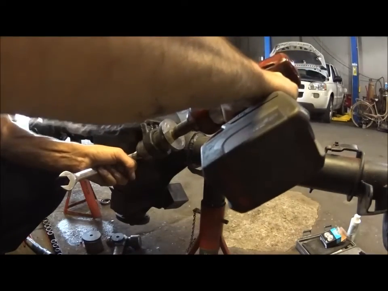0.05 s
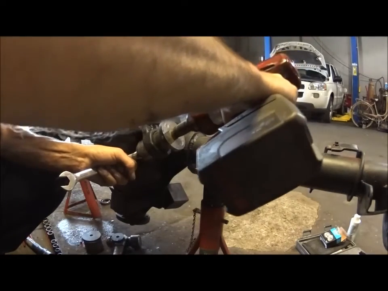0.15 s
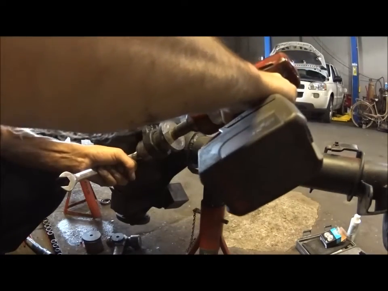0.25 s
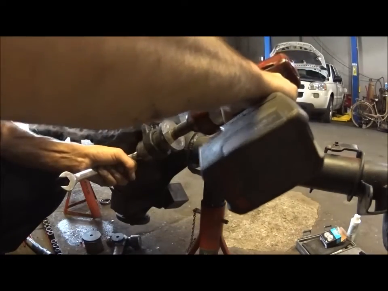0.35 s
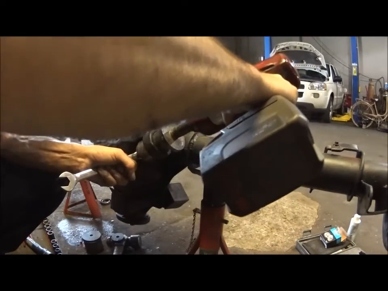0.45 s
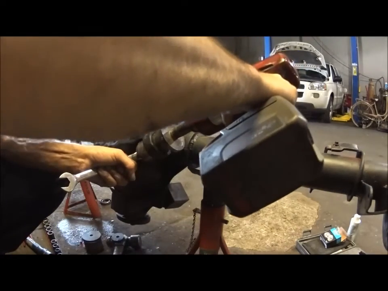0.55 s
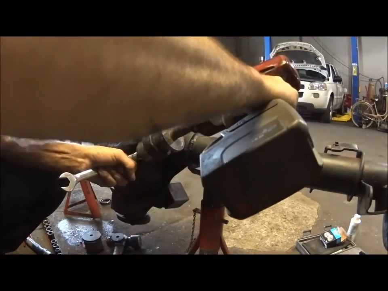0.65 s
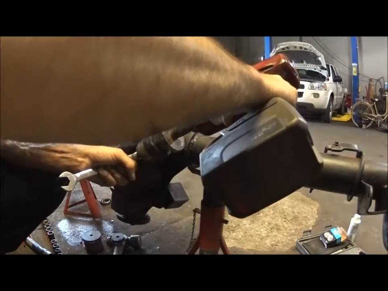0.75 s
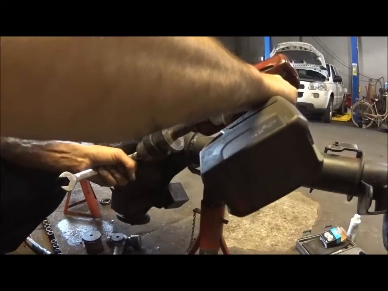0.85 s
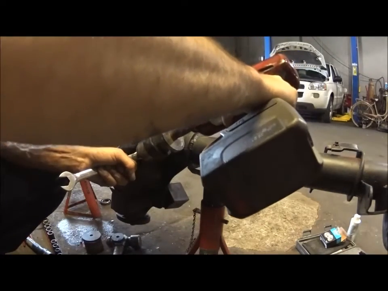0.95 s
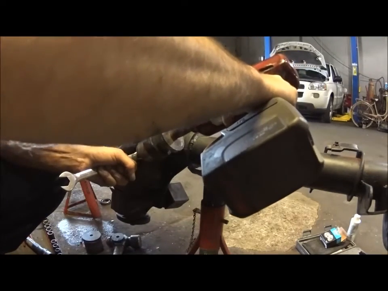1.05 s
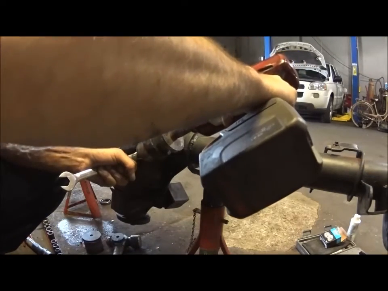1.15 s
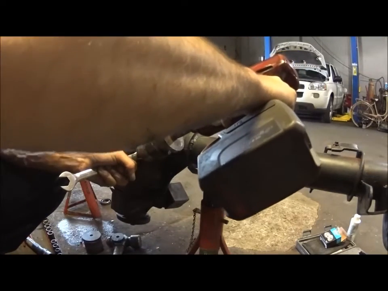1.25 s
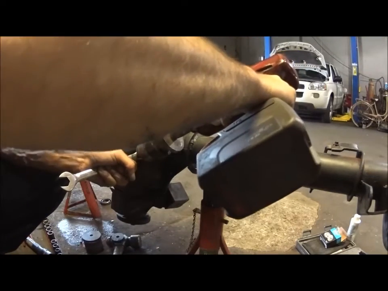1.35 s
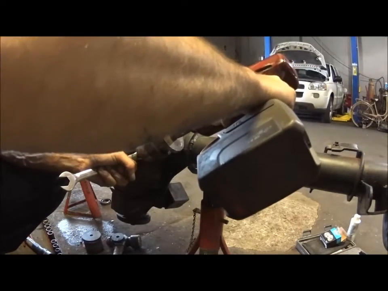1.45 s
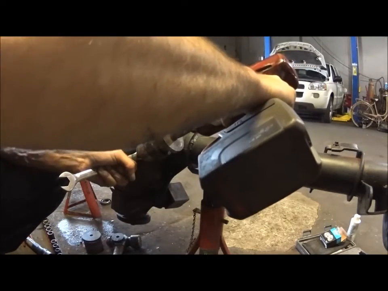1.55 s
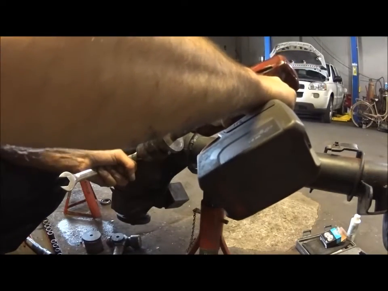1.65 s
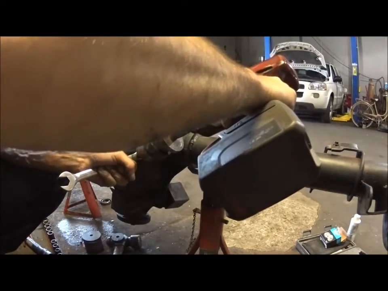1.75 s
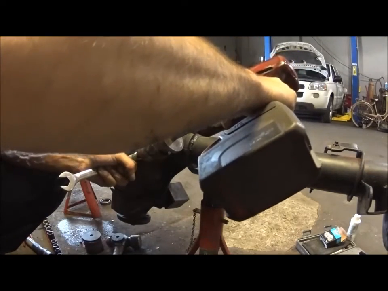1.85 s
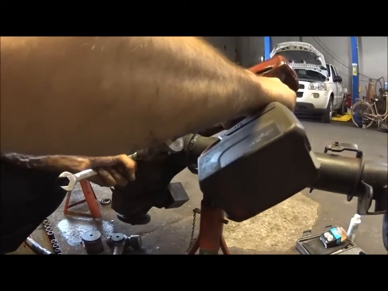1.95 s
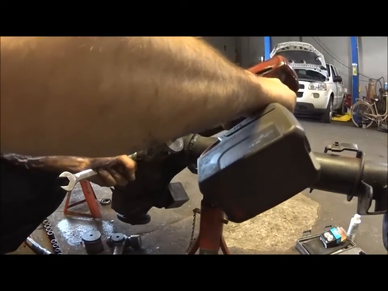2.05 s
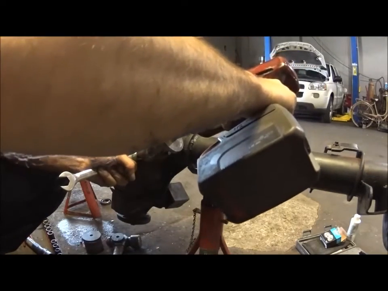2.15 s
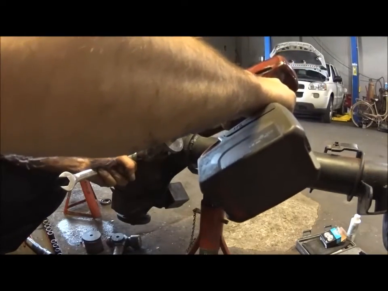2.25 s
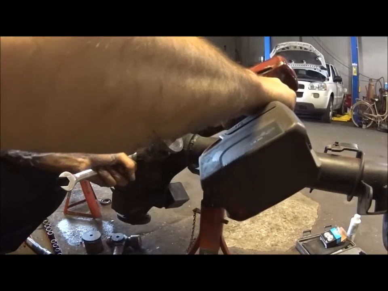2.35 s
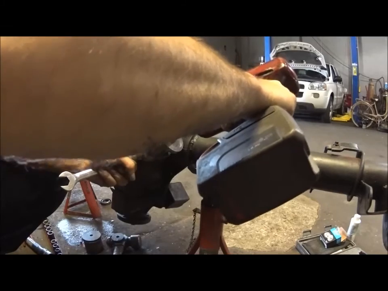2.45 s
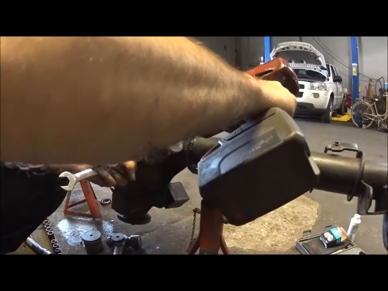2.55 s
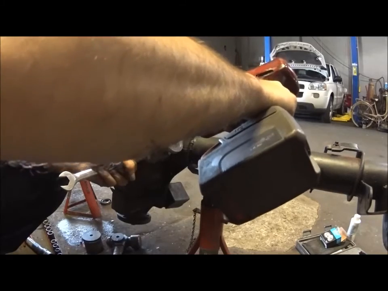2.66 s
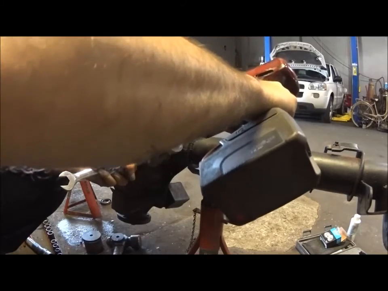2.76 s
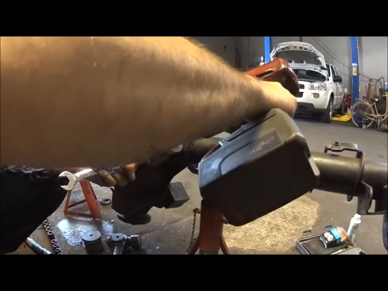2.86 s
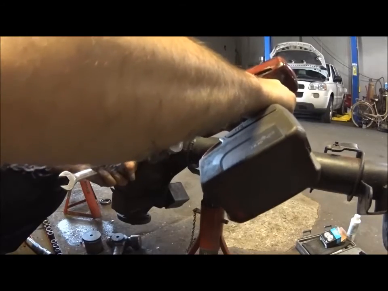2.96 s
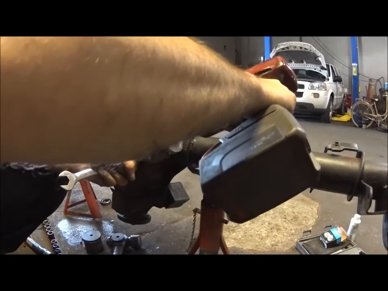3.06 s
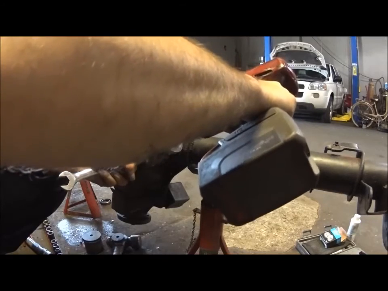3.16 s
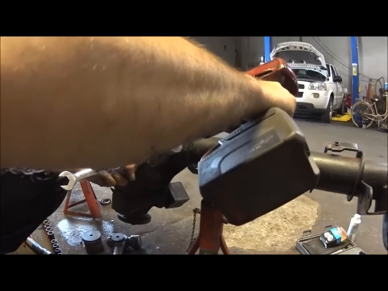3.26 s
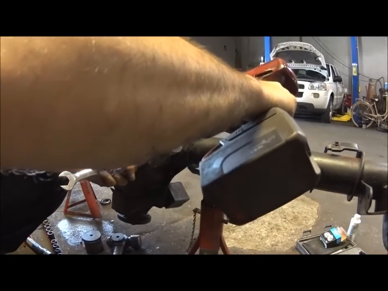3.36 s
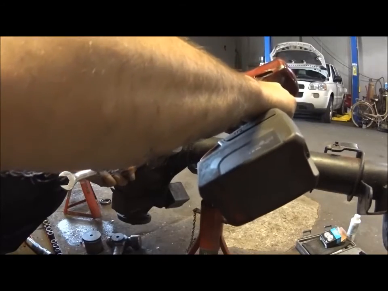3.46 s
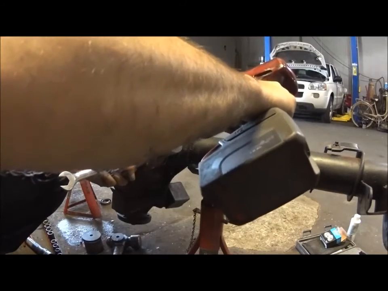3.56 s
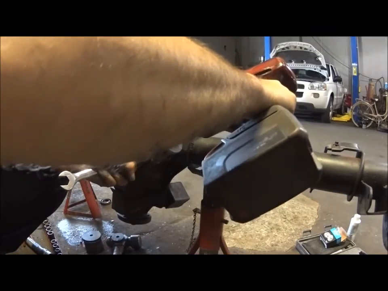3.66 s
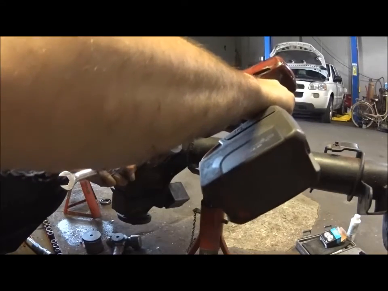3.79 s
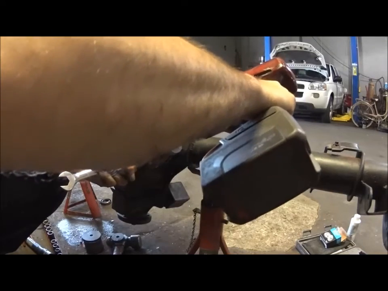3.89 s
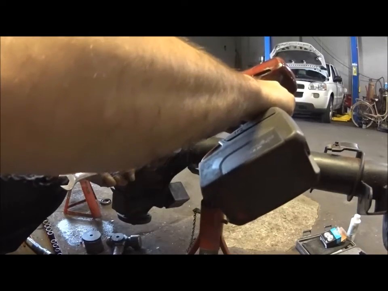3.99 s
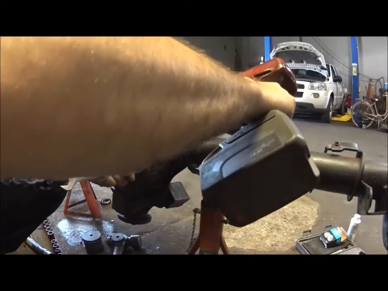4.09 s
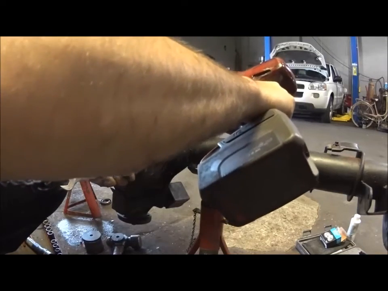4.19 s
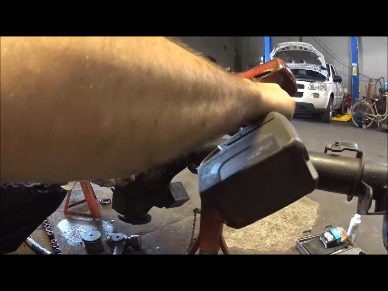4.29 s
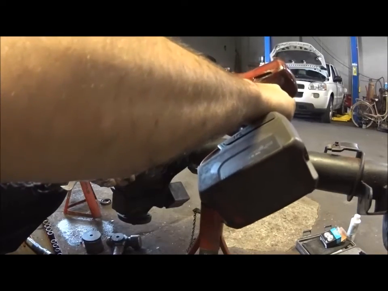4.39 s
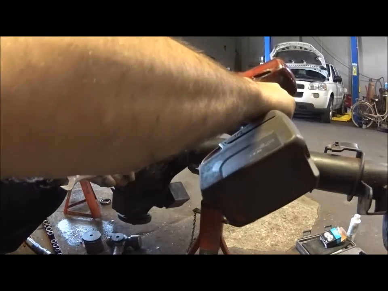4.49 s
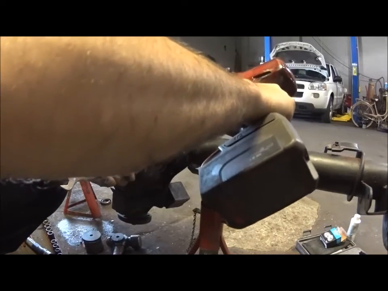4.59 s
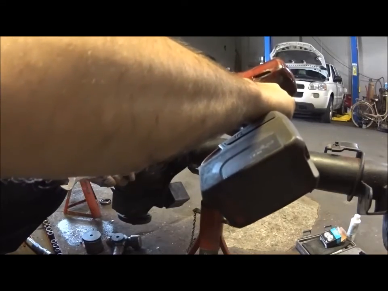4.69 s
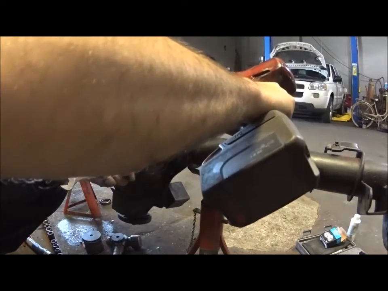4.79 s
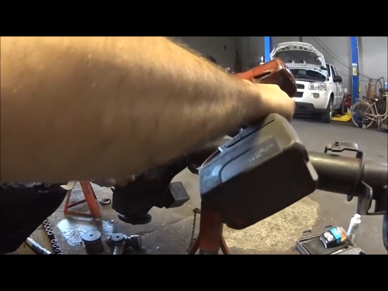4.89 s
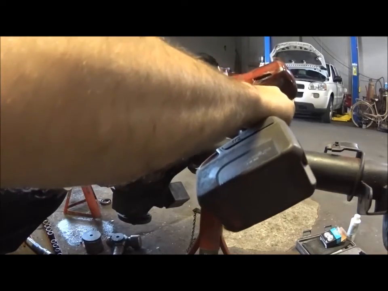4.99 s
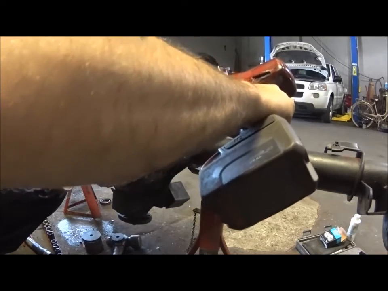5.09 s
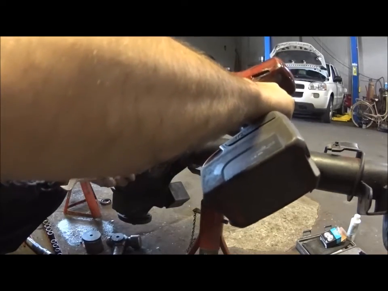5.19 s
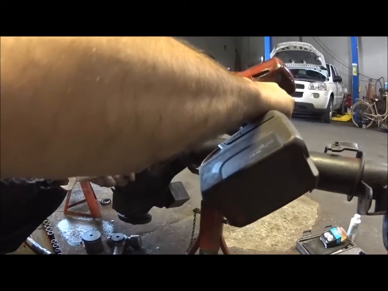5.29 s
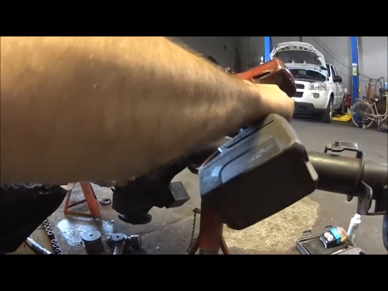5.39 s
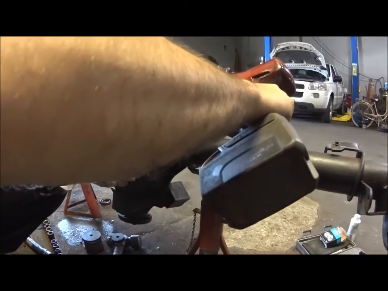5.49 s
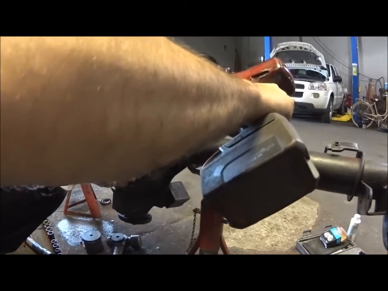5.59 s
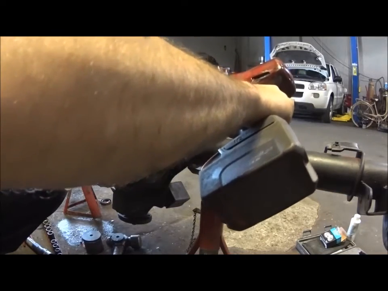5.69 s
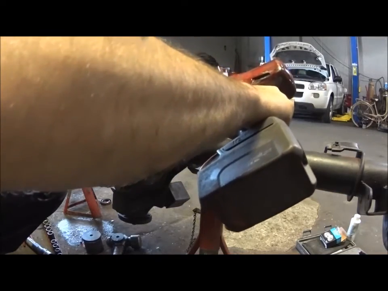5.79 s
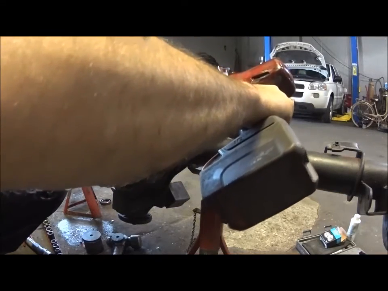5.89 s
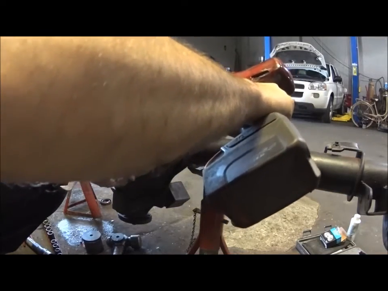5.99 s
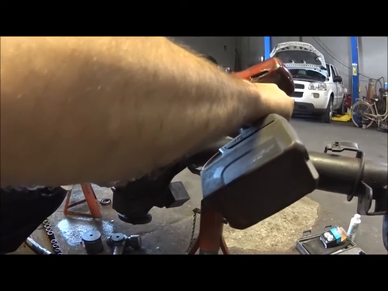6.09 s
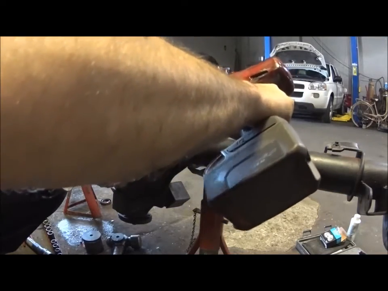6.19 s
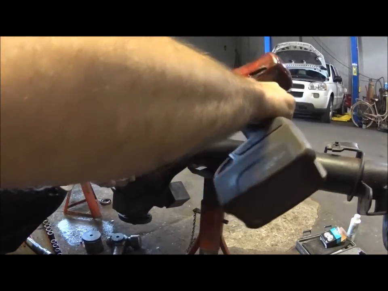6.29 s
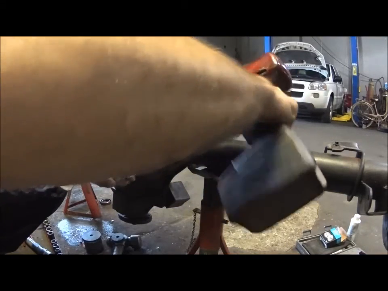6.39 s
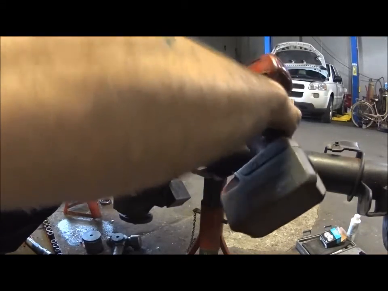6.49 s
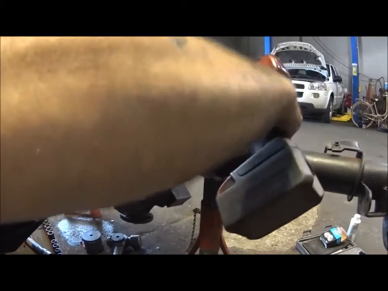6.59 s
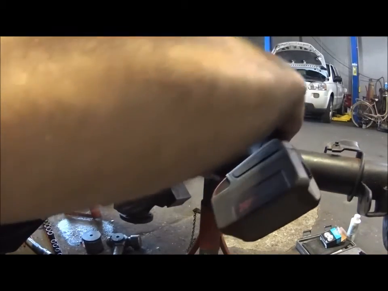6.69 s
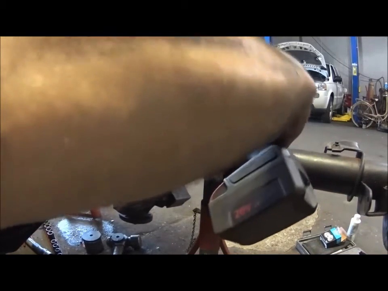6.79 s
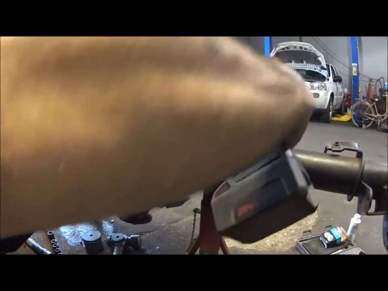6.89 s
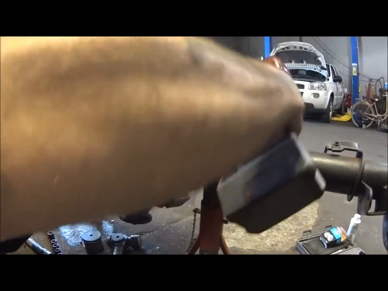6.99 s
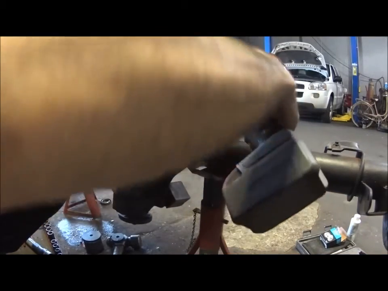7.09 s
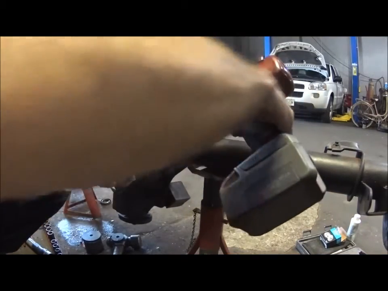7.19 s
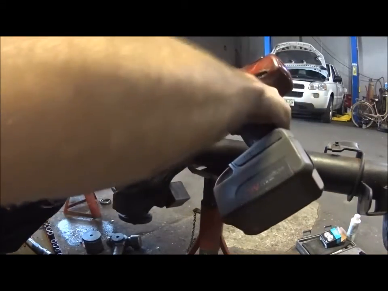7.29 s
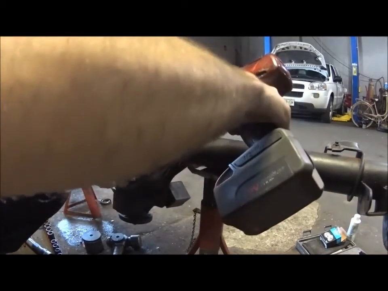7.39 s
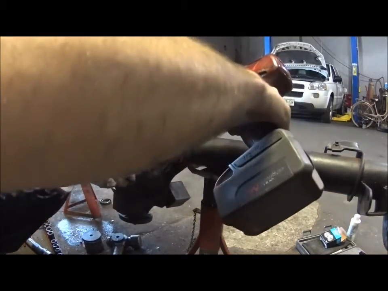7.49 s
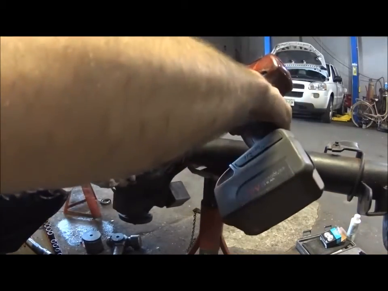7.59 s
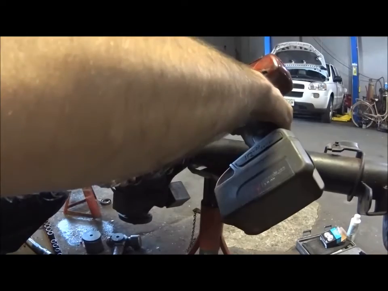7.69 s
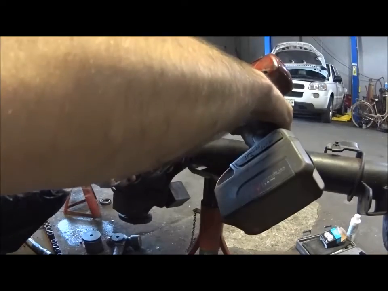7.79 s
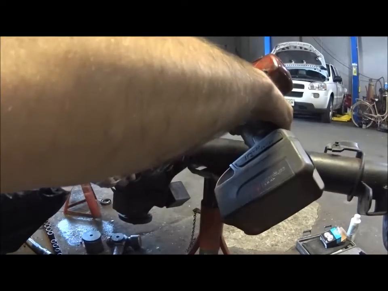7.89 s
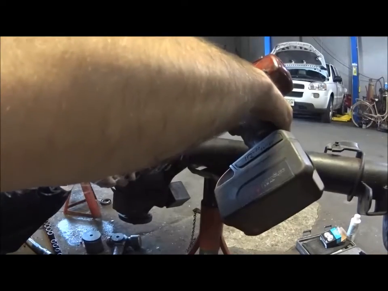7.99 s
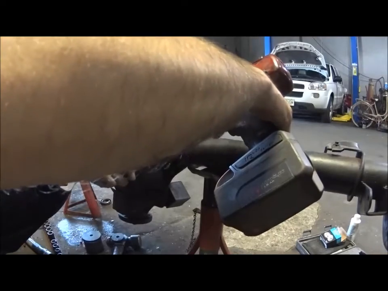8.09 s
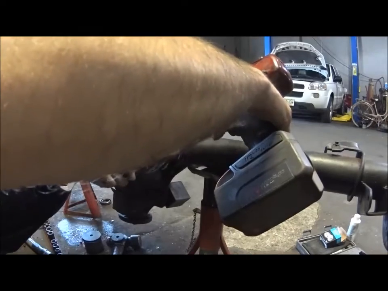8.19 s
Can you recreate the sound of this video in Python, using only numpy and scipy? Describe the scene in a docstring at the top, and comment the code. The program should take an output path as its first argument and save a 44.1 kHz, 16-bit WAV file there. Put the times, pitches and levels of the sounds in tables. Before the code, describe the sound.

Loud, rasping metal hammering fills the opening: a power wrench in a steel housing, each fast turn mixing loose rattle, rebound and a bright blow. The pitch barely moves while the metallic colour shifts as the bolt tightens. It cuts off suddenly, leaving a short ringing tone and garage reverberation. Half a second later comes one sharp mechanical click, then tiny dull taps and a quiet room wash with low hum. Close, slightly overloaded stereo microphone.

```python
"""First heard, already at full speed: an impact wrench on a bolt in a steel housing, close to a small
stereo microphone in a garage. Each turn brings loose rattle, dull knocks, a rebound, a hush and a bright blow.
Shaped noise bursts drive resonators for the steel; decaying sines make thud, pings, ringing and clicks.
The trigger is let go at 6.3 s, steel and room ring out, a latch clicks, and air and hum go on."""
import sys
import numpy as np
from scipy import signal
from scipy.fft import rfft, irfft, next_fast_len
from scipy.io import wavfile
from scipy.ndimage import uniform_filter1d

SR = 44100
rng = np.random.default_rng(int(sys.argv[2]) if len(sys.argv) > 2 else 0)


def put_to_file(sound):
    """Save the sound as 16-bit audio at rate SR, in the file named by the first command-line argument."""
    columns = np.atleast_2d(sound).T  # one column per channel
    safe = np.clip(columns, -1, 1)
    whole_steps = np.round(safe * 32767)
    wavfile.write(sys.argv[1], SR, whole_steps.astype(np.int16))


N = 363825
TIME = np.arange(N) / SR  # s
LAST_BLOW_S, STOP_S = 6.314, 6.337  # last blow; the trigger is let go


def amp(db):
    """Amplitude factor of a level in dB."""
    return 10 ** (np.asarray(db) / 20)


def evened(x):
    """Scale to rms 1."""
    return x / np.sqrt(np.mean(x ** 2) + 1e-20)


def read(points, hz):
    """Interpolate a (f/Hz, value) table along log frequency."""
    f, value = np.transpose(points)
    return np.interp(np.log(hz + 1), np.log(f + 1), value)


def colour(x, points):
    """Causal minimum-phase filter whose gain follows a (f/Hz, level/dB) table."""
    gain = np.log(amp(read(points, abs(np.fft.fftfreq(4096, 1 / SR)))))
    taps = np.fft.ifft(np.exp(gain - 1j * signal.hilbert(gain).imag)).real[:2048]
    return signal.oaconvolve(x, taps)[:len(x)]


def resonate(x, hz, width):
    """One mode as a two-pole resonance, gain 1 at its centre."""
    return signal.lfilter(*signal.iirpeak(hz, hz / width, SR), x)


def wander(step):
    """Slow chance of rms 1: a new value every step seconds, joined by lines."""
    knots = np.arange(0, N / SR + 2 * step, step)
    return evened(np.interp(TIME, knots, rng.standard_normal(len(knots))))


def per_turn(turns, spread_db):
    """A random gain that is drawn anew for every turn."""
    gains = amp(spread_db * rng.standard_normal(int(turns.max()) + 1))
    return gains[turns.astype(int)]


def chatter(sharp_db):
    """Dense steel-on-steel contacts: noise with a few strong samples."""
    strength_db = sharp_db * np.minimum(rng.exponential(1, N), 5)
    return evened(rng.standard_normal(N) * amp(strength_db))


def strokes(rows, turns, spread_db, sharp_db):
    """Bursts of contacts that start at once and die away, at fixed places in each turn."""
    out = np.zeros(N)
    for place, db, decay_s in rows:
        count = np.floor(turns + 1 - place)
        starts = np.diff(count, prepend=count[0]) > 0
        start = starts * per_turn(count, spread_db)
        out += amp(db) * signal.lfilter([1], [1, -np.exp(-1 / (decay_s * SR))], start)
    return out * chatter(sharp_db)


# hammer speed: sags as the bolt tightens, the last full turn drags, then the hammer slips free
# columns: t/s, speed/turns per s
HAMMER_SPEED = [(0, 32.463), (1.25, 32.738), (3.0, 32.359), (3.75, 32.405), (6.279, 32.04), (6.281, 26.6),
                (6.315, 26.6), (6.317, 41)]
FIRST_TURN = .498  # part of a turn already done at the start


def hammer_turns():
    """Turns completed so far, the running sum of the speed."""
    return FIRST_TURN + np.cumsum(np.interp(TIME, *np.transpose(HAMMER_SPEED))) / SR


# strength of each turn of the hammer against the usual turn, one row per turn; CONTRAST widens every level
# columns: blow level/dB, rattle level/dB, rebound snap level/dB, rebound weight level/dB
TURN_LEVELS = [(0.0, 3, 1, -0.5), (-3, 1.5, 3, 1), (4.5, 0, 4, -3), (4, 1, 3.5, 2.5), (3.5, 0, 1.5, 6),
               (-2.5, 1, -2.5, -6.5), (-4, 2, -5, 4), (3.5, 1.5, -3, 5.5), (-6.5, 0.5, -1, -1.5),
               (4, 2, -8.5, 0.5), (-7, 4, -2.5, -6), (1.5, -4.5, 3, 3), (3, 2, -5, 7.5), (5, 0.5, 5, 2.5),
               (-7, 2.5, 0.5, -2), (-1, 0.5, -4, 2.5), (-1.5, -2, -1, 5.5), (-2, 2.5, 4.5, 5),
               (-5.5, 2, 2.5, 4), (0.5, -1.5, -1, -6), (-2, 1, 0.5, 0), (-6.5, 1.5, -7, -1),
               (1.5, -2, 2.5, 5.5), (-1, -4, 3, 0.5), (4.5, -0.5, 6, 1), (2.5, 1.5, -1, 0.5),
               (-0.5, 1, 3.5, 4), (-1.5, -0.5, -2, 0.5), (1.5, 4, 1, 3), (4.5, 0, 11.5, 3.5),
               (-1, -0.5, -1, -1), (-6, 1, -5, 6.5), (0, 1, 3, 2.5), (-0.5, 2, -1.5, 0.5),
               (0.5, -3, 4.5, -10.5), (1.5, 3, -3, 3.5), (-0.5, 1.5, 4, -6.5), (0.5, 1, 1, -1.5),
               (-2, 0.5, 0.5, 1), (0.5, -3.5, 6.5, 4), (0, -1, 5, 2.5), (2, 2, 2, -1), (0, -0.5, 5, 4),
               (1.5, 1, 0.5, 3), (4.5, 2, 3.5, 1.5), (-1.5, 0.5, -4, 1.5), (-5.5, 3.5, 2, -3),
               (-4.5, 0.5, -3, 1.5), (-2, 3, -1, 3.5), (-2, 4.5, 1.5, -1.5), (-0.5, -5.5, 6, 1.5),
               (0.5, 1.5, 1, -2.5), (1, 0, -2.5, 2.5), (4, 0.5, 2, 5.5), (-1, 0.5, -3.5, 0),
               (1.5, -0.5, -3.5, 1), (-2, 2.5, -2.5, 4.5), (-2, 1.5, -7, -7), (-0.5, 0, -5, -0.5),
               (-4, 1.5, -2, -2), (-0.5, 0, 2.5, -0.5), (3.5, 3, 0.5, -5.5), (-1, 1.5, 0.5, 3),
               (2, -2, -2.5, 1), (-4.5, 1.5, -5, 0.5), (5.5, 1.5, 1, 1.5), (3.5, 0, 7.5, 0.5),
               (-1, -0.5, 4, 1.5), (-6.5, 1, -1, -11.5), (-1, 1, -3.5, 2), (-3.5, 4.5, 1.5, -3.5),
               (1, 1, -3.5, 2), (-5.5, 4.5, -3, 1.5), (-3, 2, -1, 2), (-0.5, -0.5, -2, 1.5),
               (2.5, 1, -2, 3), (-1.5, -0.5, 2, -0.5), (0, 0.5, -1, -1.5), (3, 3.5, 2, -0.5),
               (-1, 2.5, 1, -6.5), (-3, -4.5, 5.5, 3), (0, 3.5, -3, -1), (-5, 2, -11, -4.5),
               (-1, -1.5, -2, -8), (3.5, -1.5, 5, -3), (0.5, 1.5, 3, 3.5), (-1.5, -2.5, 5.5, 1),
               (1.5, 1.5, -1.5, -0.5), (-8, 2.5, -10, 3.5), (5, 1, -4.5, -7.5), (1.5, -1, -3.5, -4.5),
               (3, 1.5, -3.5, 1.5), (-4.5, -1, 2.5, 4.5), (-3.5, 1, -8, 2), (1, -1, 7, 2), (3, 2, 0, 0),
               (2, 1, -1.5, -2), (3, 2, -2, -3), (-0.5, 0.5, 2.5, -1), (4.5, 4, -2, 2), (-7.5, 2, -4, 1),
               (-4.5, 3, 0, -5.5), (-1, -1, 0, 2.5), (4.5, 2.5, -7, 0), (0.5, 2, 4.5, -2),
               (2, -1.5, -9, -5), (0.5, 1, -7, -2), (1, 2.5, 5.5, 0.5), (-1.5, 1.5, -2.5, -1.5),
               (4, 1.5, -1.5, -3), (6, 1, 2.5, -3.5), (0.5, 1.5, -4, 0), (1.5, -1, -3.5, 0.5),
               (-1.5, 4, 1, -4.5), (1, 0.5, -2.5, 1), (-3, 4.5, 6, -8), (-3.5, 0, -1.5, -5),
               (-1, -0.5, 2.5, 1.5), (3.5, 0.5, -4.5, -5), (-3.5, 1.5, -10, -9.5), (-3, 0, -6, 2.5),
               (2.5, 3, -3, -8), (1, 1.5, 0, 0), (6, 3.5, 0, 4), (-2.5, 0.5, 2.5, 3), (-5, -0.5, 5, -0.5),
               (4.5, 2, -2, 0.5), (-5.5, 2.5, 2.5, 3.5), (-2.5, 2.5, 9.5, 0), (-4.5, 1.5, -2.5, -3.5),
               (2.5, 2.5, -2, -0.5), (-2, -1.5, 0.5, -5), (4.5, -4.5, 4, 1.5), (1, -3, -0.5, -2.5),
               (3.5, 0.5, -8.5, -9.5), (-1, 1.5, -7, 2.5), (-4, 2, -1.5, 1.5), (1.5, 0.5, 0, -1.5),
               (-5, 4, -7, -6.5), (0, 1, 0.5, 1), (4.5, 2, 2, -3), (-4, 2.5, 6, -4.5), (1.5, 0.5, 4, 2.5),
               (2, 2, -3, 5.5), (-1.5, -4, 2.5, 3.5), (0, 2, 3, -8), (-5, 4.0, 0.5, -7.5), (0, -1, -3, 4),
               (-1, -1, -7.5, -3), (-6, 4, -2.5, -8), (2, -0.5, 0.5, 1.5), (5, 0.5, -8, -1.5),
               (-4, 3.0, -4.5, -5), (-12, 3.5, 2, 0), (1, 2, 5.5, 1.5), (1.5, -3.5, 2, -1.5),
               (-0.5, -2, -1, 1), (4.5, 1, 1, 0.5), (-1.5, 1, 9, -4), (3.5, 4, -4, -2.5),
               (-3, 2, 0.5, -3.5), (3, 2, -3, -2.5), (0, 1, 0, 0.5), (-3, -0.5, 2.5, 1),
               (3.5, 3.5, 3, -4.5), (4.5, 3, 1, -4), (1, 2.5, 0, -4.5), (1, 1.5, -2, 2),
               (3.5, 1.5, -3, 3.5), (0, 1, 2.5, 2.5), (-4, 2.5, 0, -7), (8.5, 1, 8.5, -13.5),
               (-0.5, 0.5, -2.5, 0.5), (-3, 3, -3.5, -0.5), (-6, 4, -3, 3), (-2, -0.5, 0.5, 4),
               (2, 3.5, -3, -2.5), (0, -2.5, 0.5, -1), (-1.5, 3, -4, -10.5), (2, 2, 2.5, 1),
               (-1, 2.5, 6, 4), (1.5, 1, 4, 3.5), (4.5, -1.5, -4.5, -4.5), (3.5, 1.5, 4.5, 2),
               (1.5, -2, -0.5, -8), (-2, -2, 6.5, -5.5), (0, -2, 5.5, 0.5), (-4.5, 1.5, -0.5, 6.5),
               (2, 1, 1, -1), (-3.5, 4, 1.5, 1.5), (1, 1, -3, -2.5), (-9, 3.5, -6.5, 3),
               (-0.5, 2.5, 5.5, -3.5), (1.5, 1.5, 2.0, -3.5), (6.5, 1, 2.5, -3.5), (-0.5, 0.5, 4, -4),
               (-1.5, 4, -5, -1), (7.5, 1.5, 3.5, -2), (-5, 1.5, 2, -8), (1.5, 0.5, -3, -2.5),
               (3.5, 2.5, -0.5, -12.5), (1, 1.5, -1, -2.5), (-7.5, -3, 0.5, 1.5), (6, -1.5, 2.5, -4.5),
               (-1, -1.5, -2, -0.5), (0, 2.5, -11, -7.5)]
CONTRAST = 1.17
TURN_START = .96  # place in the turn 0-1: a row takes over in the hush before its blow


def turn_strengths(turns):
    """Gains of blow, rattle, snap and rebound weight, held through each turn."""
    row = np.minimum(turns + 1 - TURN_START, len(TURN_LEVELS) - 1).astype(int)
    return amp(CONTRAST * np.transpose(TURN_LEVELS))[:, row]


def tightness():
    """How far the bolt is seated: rises from -0.5 at the start to 0.5 at the stop."""
    return np.minimum(TIME / STOP_S, 1) - .5


# spectrum of the loose steel; columns: f/Hz, level/dB
RATTLE_SPECTRUM = [(24, -46), (40, 1.5), (130, -17.5), (202, -19.5), (461, -8.5), (978, -6.5), (1460, -6.5),
                   (1800, -1.5), (4200, -6), (5830, -6), (7040, -5.5), (10300, -11), (11000, -4.5),
                   (14300, -46), (22000, -120)]


def rattle(shaken):
    """Loose steel: unbroken chatter that comes in clumps."""
    clumps = amp(2.0 * evened(uniform_filter1d(rng.standard_normal(N), 90)))
    return shaken * evened(colour(chatter(2.3) * clumps, RATTLE_SPECTRUM))


# knocks in mid-turn; columns: place in the turn/0-1, level/dB, decay time constant/s
KNOCK_STROKES = [(.37, -2.5, 0.0022), (.525, -1, 0.0013), (.6, -3.5, 0.0017)]
# spectrum of the knocks; columns: f/Hz, level/dB
KNOCK_SPECTRUM = [(300, -18.5), (900, -11), (2000, -12.5), (4000, -17.5), (12000, -46)]


def knock(turns, shaken):
    """Dull bursts of contacts between blow and rebound."""
    bursts = strokes(KNOCK_STROKES, turns, 1.3, 2.34)
    return amp(-9.0) * shaken * evened(colour(bursts, KNOCK_SPECTRUM))


TREBLE_SHARE = .5  # the hiss of a contact follows its force by half the dB
# bright edge of the rebound; columns: place in the turn/0-1, level/dB, decay time constant/s
SNAP_STROKES = [(.70, -3, 0.0025), (.76, -12.5, 0.0014)]
# spectrum of the snap; columns: f/Hz, level/dB
SNAP_SPECTRUM = [(500, -31.5), (3500, -17), (5800, 2.5), (6500, -7), (7300, -3.5), (10000, 0.5), (12000, 2)]


def snap(turns, snappy):
    """Bright contact noise at the rebound."""
    bursts = strokes(SNAP_STROKES, turns, 0.99, 1.5)
    return amp(-2.5) * snappy ** TREBLE_SHARE * evened(colour(bursts, SNAP_SPECTRUM))


# dull part of the rebound; columns: place in the turn/0-1, level/dB, decay time constant/s
REBOUND_STROKES = [(.72, 6.5, 0.0034), (.77, 1.5, 0.0015)]
# spectrum of the rebound; columns: f/Hz, level/dB
REBOUND_SPECTRUM = [(200, -4.5), (800, 8.5), (1500, -3.5), (2300, 3), (3200, -3), (12000, -23)]


def rebound(turns, heavy):
    """The hammer bounces back: duller bursts of contacts."""
    bursts = strokes(REBOUND_STROKES, turns, 1.0, 1.84)
    return amp(-6.0) * heavy * evened(colour(bursts, REBOUND_SPECTRUM))


# hammer on anvil; columns: place in the turn/0-1, level/dB, decay time constant/s
BLOW_STROKES = [(.975, 0, .0007), (.02, -4, .001), (.15, -13, .002)]
# spectrum of the blow; columns: f/Hz, level/dB
BLOW_SPECTRUM = [(200, -31), (900, -21.5), (3300, -16), (4800, 3), (5800, -5), (6500, -8.5), (7300, 2),
                 (10200, 3), (12000, 7)]


def blow(turns, hard):
    """The hammer strikes around each whole turn: very short bright bursts."""
    bursts = strokes(BLOW_STROKES, turns, 1.0, 0.69)
    return amp(2.0) * hard ** TREBLE_SHARE * evened(colour(bursts, BLOW_SPECTRUM))


# contacts just after the blow; columns: place in the turn/0-1, level/dB, decay time constant/s
SHUDDER_STROKES = [(.03, .5, 0.0018), (.13, -2, 0.0038), (.24, -1.5, .003)]
# spectrum of the shudder; columns: f/Hz, level/dB
SHUDDER_SPECTRUM = [(500, -37), (2200, -7.5), (3000, -0.5), (4400, 0), (5500, -3.5), (12000, -14)]
SHUDDER_GAIN_DB = 5  # growth from start to stop as the bolt seats


def shudder(turns, shaken):
    """The steel shudders after the blow: longer bursts that grow as the bolt seats."""
    bursts = strokes(SHUDDER_STROKES, turns, 2.8, 1.2)
    level = amp(-6.5 + SHUDDER_GAIN_DB * tightness())
    return level * shaken * evened(colour(bursts, SHUDDER_SPECTRUM))


# modes of socket, bolt and housing; columns: f/Hz, width/Hz, level/dB
STEEL_MODES = [(965, 40, -2.5), (1007, 28, -1.5), (1165, 40, -4.5), (1345, 50, -4), (1772, 32, 1.5),
               (1929, 32, -3), (2119, 28, 1), (2185, 30, -5), (2510, 30, -6), (2548, 30, -5),
               (2720, 90, -7), (2975, 35, -4), (3035, 26, -1), (3350, 120, -8), (3660, 32, -1),
               (3940, 57, -7), (4600, 40, -5), (4645, 40, -2), (4854, 40, -6), (5005, 40, -6),
               (5262, 39, -3), (5420, 40, -6), (5820, 90, -6), (6045, 54, -5), (6320, 40, 0),
               (6648, 35, -6), (7410, 42, -8), (8283, 50, -6), (9400, 150, -8), (10200, 560, -5)]
# shift in mode strength as the bolt tightens; columns: f/Hz, level gained from start to stop/dB
TIGHTENING_GAIN = [(700, -0.5), (985, 5), (1340, 6.5), (1770, 2.5), (3000, -1.5), (3660, 10.5),
                   (4640, -4.5), (5260, 11), (6320, -2.5), (8280, -25), (10200, -10)]


def steel_modes(drive):
    """The contacts excite resonances; the creeping socket makes each swell and fade over a few turns."""
    flat = evened(colour(drive, [(200, 5.5), (1000, 3.82), (12000, 2.6)]))
    tight, out = tightness(), 0
    for hz, width, db in STEEL_MODES:
        swell = amp(1.7 * wander(.09))
        ends = amp(read(TIGHTENING_GAIN, hz) * np.array([-.5, .5]))
        tightened = np.interp(tight, [-.5, .5], ends)
        out = out + amp(db) * resonate(flat * swell * tightened, hz, width)
    return evened(out)


# push of the tool body at the rebound; columns: f/Hz, level/dB, t60/s
BODY_THUD = [(492.5, 15.5, 0.026), (674, 10, 0.03)]


def body_thud(turns, running, heavy):
    """Each rebound pushes the tool body, which answers with two low damped sines."""
    # prepend=1 puts one inverted push on the very first sample
    push = np.diff(np.floor(turns + 1 - .70), prepend=1) * running * heavy
    u = np.arange(3000) / SR
    thud = -sum(amp(db - 60 * u / t60) * np.sin(2 * np.pi * hz * u) for hz, db, t60 in BODY_THUD)
    return amp(-19.0) * evened(signal.oaconvolve(push, thud)[:N])


# tones of the anvil; columns: lowest f/Hz, highest f/Hz, level/dB, t60/s
ANVIL_TONES = [(5530, 5900, -1, .014), (6100, 6350, -4, 0.014), (9080, 10800, -1, 0.0074)]
# one entry for the blow, one for the rebound; place in the turn/0-1
PING_TIMES = (.992, .705)
PING_SHARE = .7  # pings follow the force by this share of its dB
PING_GAIN_DB = 14  # growth of the blow's force on the pings from start to stop, before PING_SHARE


def pings(turns, hard, snappy):
    """The anvil rings briefly at blow and rebound, pitched a little differently at every contact."""
    out, u = np.zeros(N + 800), np.arange(800) / SR
    rise = np.minimum(u / 0.00021, 1)
    forces = (hard * amp(PING_GAIN_DB * tightness()), snappy)
    for place, force in zip(PING_TIMES, forces):
        passed = np.diff(np.floor(turns + 1 - place))
        at = np.flatnonzero(passed * (np.arange(N - 1) < STOP_S * SR))
        for i, draw in zip(at, rng.random((len(at), len(ANVIL_TONES), 2))):
            for (low_hz, high_hz, db, t60), (pitch, luck) in zip(ANVIL_TONES, draw):
                hz = low_hz + (high_hz - low_hz) * pitch
                tone = amp(db - 60 * u / t60) * np.sin(2 * np.pi * hz * u) * rise
                out[i:i + len(u)] += force[i] ** PING_SHARE * (.5 + luck / 2) * tone
    return evened(out[:N])


# little bass leaves small steel parts; columns: f/Hz, level/dB
SMALL_STEEL = [(30, -27), (100, -22), (250, -4.5), (500, -2.5), (12000, 0)]
USUAL_FORCE_DB = -22


def wrench():
    """All contacts excite the steel; returns the sound close by and the sound sent to the walls."""
    turns = hammer_turns()
    running = np.exp(-np.maximum(TIME - STOP_S, 0) / 0.0052)
    hard, shaken, snappy, heavy = turn_strengths(turns)
    drive = rattle(shaken) + knock(turns, shaken) + snap(turns, snappy)
    drive = drive + rebound(turns, heavy) + blow(turns, hard) + shudder(turns, shaken)
    drive = drive * running
    tones = body_thud(turns, running, heavy) + amp(-9.5) * pings(turns, hard, snappy)
    broad = amp(USUAL_FORCE_DB) * colour(evened(drive), SMALL_STEEL)
    ringing = amp(USUAL_FORCE_DB - 3.5) * colour(steel_modes(drive), SMALL_STEEL)
    near = amp(USUAL_FORCE_DB) * colour(tones, SMALL_STEEL)
    # modes, pings and thud are strong close by and reach the walls more weakly
    return broad + ringing + near, broad + amp(-19.0) * ringing + amp(-8.0) * near


# balance of the two microphone ports; columns: f/Hz, left-right level/dB
PORT_BALANCE = [(60, -2.5), (110, 1), (190, -2), (350, -2.5), (630, -10), (1130, -6.5), (2020, -3),
                (3640, -2), (6540, -0.5), (11800, -2)]
# phase lead of the left port over the right; columns: f/Hz, phase/rad
PORT_LEAD = [(40, 0), (130, -.9), (340, -2.0), (600, -2.1), (1030, -.9), (2150, -.6), (2580, -2.0),
             (2930, -.7), (3960, -.35), (12000, -.3)]


def ports(x):
    """The arm and the housing shade the two ports differently: balance and phase lead by frequency."""
    size = next_fast_len(N + 4096)
    hz = np.fft.rfftfreq(size, 1 / SR)
    half = amp(read(PORT_BALANCE, hz) / 2) * np.exp(1j * read(PORT_LEAD, hz) / 2)
    return irfft(rfft(x, size) * np.array([half, 1 / half]), size)[:, :N]


# left-right likeness of room and air at the close ports; columns: f/Hz, correlation/-1 to 1
PORT_LIKENESS = [(30, 1), (60, 0.85), (170, -0.57), (500, -0.65), (1420, 0.13), (4090, -0.16),
                 (11800, 0.44)]


def alike(left, other, hz):
    """Mix two independent spectra into a left-right pair of the given likeness."""
    same = np.clip(read(PORT_LIKENESS, hz), -1, 1)[:, None]
    return np.array([left, same * left + np.sqrt(1 - same ** 2) * other])


# decay of the garage; columns: f/Hz, t60/s
GARAGE_DECAY = [(150, 0.38), (400, 0.78), (1040, 1.19), (1700, 0.88), (2760, 1.15), (7280, 0.62),
                (11000, 0.49)]


def garage(x, first=500):
    """Echoes from the walls: taps of random sign, each band dying at its own speed."""
    taps = np.zeros((2, 2 * SR))
    grid = np.arange(round(first), 2 * SR - 20, 20)
    at = grid + rng.integers(0, 20, (2, len(grid)))
    np.put_along_axis(taps, at, rng.choice([-1., 1.], at.shape), 1)
    hz, t, z = signal.stft(taps, SR, nperseg=256)
    decay = amp(-60 * t / read(GARAGE_DECAY, hz)[:, None])
    tail = signal.istft(alike(z[0], z[1], hz) * decay, SR, nperseg=256)[1]
    lead = SR  # one second of hammering has already filled the room at the start
    before = np.concatenate([x[:, :lead], x], axis=1)
    return signal.fftconvolve(before, tail / np.linalg.norm(tail[0]), axes=1)[:, lead:lead + N]


# instant of hush before each blow; columns: place in the turn/0-1, level/dB
HUSH_GAIN = [(0, 0), (.45, 0), (.66, -1.5), (.71, 0), (.885, 0), (.92, -6.5), (.95, -9), (.97, -6.5),
             (.99, -1), (1, 0)]


def hush():
    """Gain on wrench and room that follows the place in the turn up to the last blow."""
    level_db = np.interp(hammer_turns() % 1, *np.transpose(HUSH_GAIN))
    return amp(level_db * (TIME < LAST_BLOW_S))


# long ringing parts; columns: f/Hz, driven level/dB, level gained at the last blow/dB, t60/s
LONG_RING = [(1371, -47.5, 2, 2.7), (1380.3, -47.5, 2, 2.7), (2119, -46, 21, .42), (2546, -46, 13, 1.0),
             (2290, -50, 8, .9), (2459, -50, 15, .7), (1165, -48, 9, .6), (1009, -50, 7, .6),
             (2830, -54, 11, .7), (3020, -44, 2, .6), (3165, -54, 10, .7), (3660, -48, 0, .4)]


def ring():
    """Long modes waver while driven and die away freely after the stop; the close pair beats."""
    out = 0
    for hz, db, last_db, t60 in LONG_RING:
        waver = wander(.04) * np.clip((STOP_S - TIME) / 0.06, 0, 1)
        gained_db = last_db * np.clip((TIME - LAST_BLOW_S) / .01, 0, 1)
        decay_db = 60 * np.maximum(TIME - STOP_S, 0) / t60
        level_db = db + gained_db + 0.89 * waver - decay_db
        # all modes are in phase at 6.802 s
        out = out + amp(level_db) * np.sin(2 * np.pi * hz * (TIME - 6.802) + .9 * waver)
    return out


# the frame shakes in step; columns: multiple of the hammer rate, level at the start/dB, level at the stop/dB
FRAME_SHAKE = [(1, -68, -72), (2, -60, -66), (3, -70, -70), (4, -57, -57), (5, -61, -60), (6, -65, -63),
               (8, -53, -54), (11, -51.5, -53), (14, -52, -53)]


def shake():
    """Low multiples of the hammer rate, each wavering on its own."""
    out, turns = 0, hammer_turns()
    for k, start_db, stop_db in FRAME_SHAKE:
        waver = wander(.08)
        level_db = np.interp(TIME, [0, STOP_S], [start_db, stop_db]) + 2.2 * waver
        phase = 2 * np.pi * (k * turns + rng.random()) + .5 * waver
        out = out + amp(level_db) * np.sin(phase)
    return out * np.exp(-np.maximum(TIME - STOP_S, 0) / .03)


# spectrum of the distant wash; columns: f/Hz, level/dB per Hz (relative)
AIR_SPECTRUM = [(15, -44), (25, -15), (141, -10), (235, -7), (444, -7.5), (531, -5), (1360, -10.5),
                (2050, -16.5), (7320, -27), (11000, -34.5), (14300, -67.5), (22000, -120)]
# balance of the wash; columns: f/Hz, left-right level/dB
WASH_BALANCE = [(60, 0.5), (170, -4.5), (500, -11.5), (1420, -5.5), (4090, 0), (11800, 0)]
# level of the wash; columns: t/s, level/dB
WASH_LEVEL = [(6.95, -53), (7.064, -53), (7.698, -51.5), (8.068, -51.5), (8.25, -50.5)]


def air():
    """Distant wash: shaped noise with patches of level that drift in time and frequency."""
    frames, hz = N // 256 + 5, np.fft.rfftfreq(1024, 1 / SR)
    a, b, c, d, patches = rng.standard_normal((frames, 513, 5)).T
    patches = evened(uniform_filter1d(uniform_filter1d(patches, 5, axis=0), 16, axis=1))
    z = alike(a + 1j * b, c + 1j * d, hz)
    side_db = read(WASH_BALANCE, hz)[:, None] / 2
    z *= amp(read(AIR_SPECTRUM, hz)[:, None] + 1.8 * patches + np.array([side_db, -side_db]))
    wash = evened(signal.istft(z, nperseg=1024, noverlap=768)[1][:, :N])
    return amp(np.interp(TIME, *np.transpose(WASH_LEVEL))) * wash


# a machine runs somewhere; columns: f/Hz, level/dB before the common 4 dB lift
MACHINE_HUM = [(145.3, -71), (290.7, -64.5), (360.7, -70), (436.0, -64.5), (576.0, -70), (726.7, -82.5)]


def hum():
    """Steady sines whose levels waver independently."""
    out = 0
    for hz, db in MACHINE_HUM:
        level = amp(db + 4.0 + 1.8 * wander(.12))
        out = out + level * np.sin(2 * np.pi * (hz * TIME + rng.random()))
    return out


# latch and small contacts; the level applies to tones and crack before the rise and bass cut
# columns: t/s, level/dB, f/Hz, second f/Hz, t60/s, crack level/dB, left-right level/dB
LATCH_CLICKS = [(6.8148, -27, 7700, 9700, .008, -8, -3.5), (6.8167, -17.5, 3250, 1390, .010, -14, -5),
                (6.8165, -19, 2350, 800, .010, -14, -5), (6.8172, -19, 1300, 1900, .011, -14, -5),
                (6.8164, -24.5, 5150, 5700, .007, -14, -5), (6.8186, -31, 9100, 6400, .012, -14, -4),
                (6.8198, -35, 880, 480, .04, -2, -5), (6.9475, -43, 500, 900, .035, -24, -7.5),
                (6.954, -38.5, 525, 980, .045, -24, -7.5), (7.2725, -37, 503, 960, .04, -18, -7)]
# spectrum of the crack; columns: f/Hz, level/dB
CRACK_SPECTRUM = [(300, -36), (600, -5), (2500, -1), (3300, 2), (4000, -7), (5200, 0), (7000, -9),
                  (12000, -14)]
CLICK_RISE_CYCLES = .9  # a low tap swells more slowly than a high tick


def clicks():
    """Each small contact is a noise crack and two tones under one decay."""
    out, u = np.zeros((2, N)), np.arange(5000) / SR
    for s, db, hz, hz2, t60, crack_db, pan_db in LATCH_CLICKS:
        tones = .6 * np.sin(2 * np.pi * hz * u) + .45 * np.sin(2 * np.pi * hz2 * u)
        crack = amp(crack_db) * evened(colour(rng.standard_normal(len(u)), CRACK_SPECTRUM))
        rise = np.minimum(u * hz / CLICK_RISE_CYCLES, 1)
        sound = amp(db - 60 * u / t60) * (tones + crack) * rise
        sound = colour(sound, [(200, -24), (420, 0), (12000, 0)])  # small parts give no bass
        out[:, round(s * SR):][:, :len(u)] += sound * amp([[pan_db / 2], [-pan_db / 2]])
    return out


def scene():
    """Wrench and room under the hush, then ringing, shaking, air, hum and clicks."""
    close, to_walls = wrench()
    small = clicks()
    room = garage(amp(-2.0) * ports(to_walls) + amp(-18.5) * small)
    hammering = (ports(close) + room) * hush()
    return hammering + ports(ring() + shake() + hum()) + air() + small


BAND_HZ, EDGE_HZ = 10990, 12360  # converter band, final band limit


def low_pass(x, hz):
    """Steep linear-phase low-pass."""
    taps = signal.firwin(1501, hz, window=("kaiser", 10), fs=SR)
    return signal.oaconvolve(x, taps[None], "same")


def record(dry):
    """A preamp rounds tall peaks, a converter narrows the band, a stage clips, then the band limit."""
    rounded = .8 * np.tanh(dry / .8)
    clipped = np.clip(low_pass(rounded, BAND_HZ), -.56, .56)
    return low_pass(clipped, EDGE_HZ)


dry = scene()
out = record(dry)
put_to_file(out)
```